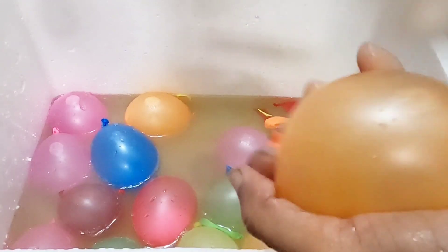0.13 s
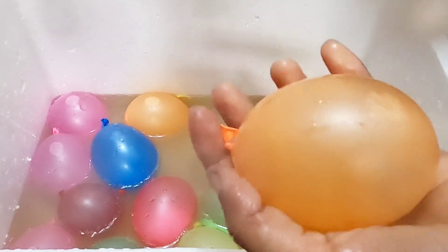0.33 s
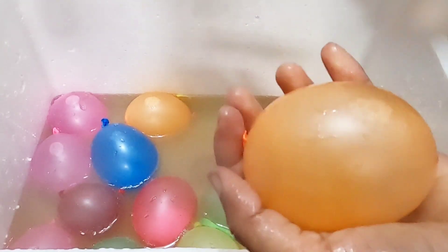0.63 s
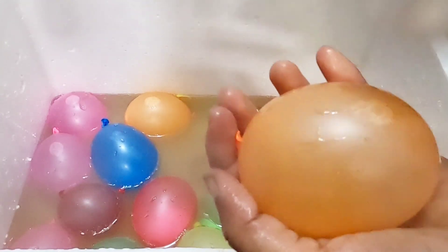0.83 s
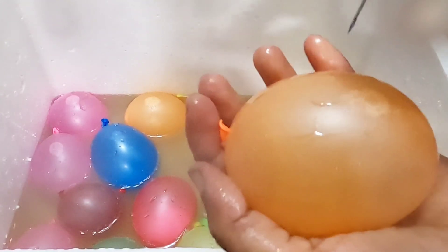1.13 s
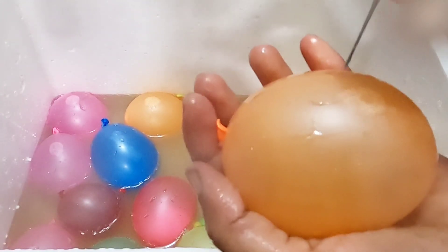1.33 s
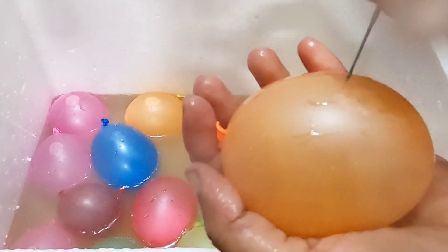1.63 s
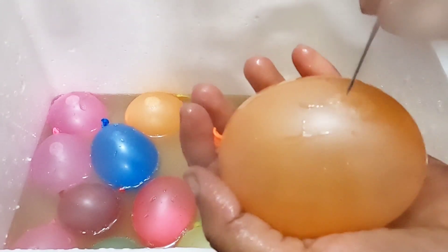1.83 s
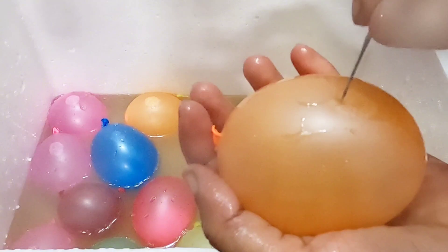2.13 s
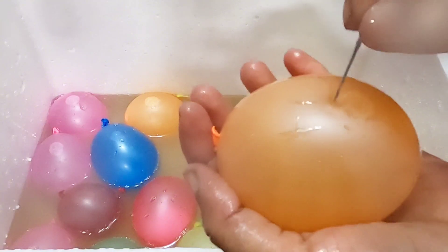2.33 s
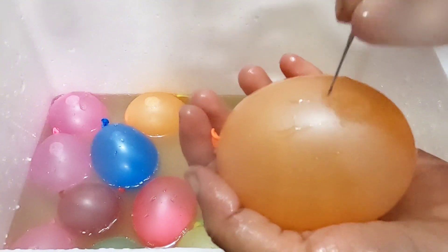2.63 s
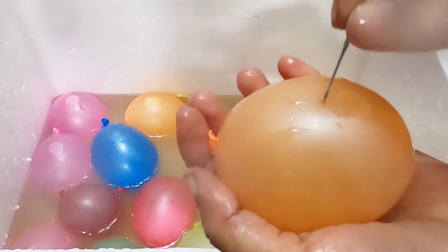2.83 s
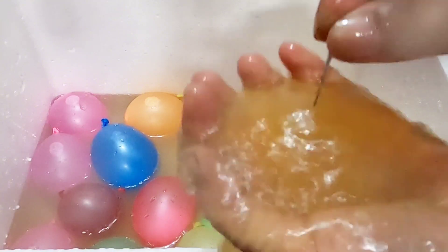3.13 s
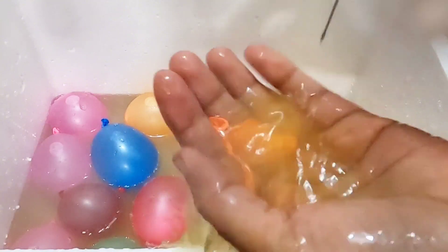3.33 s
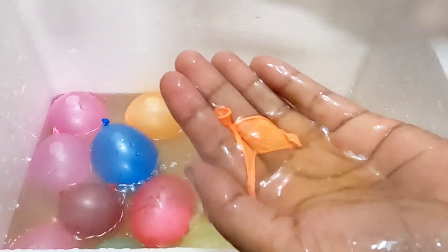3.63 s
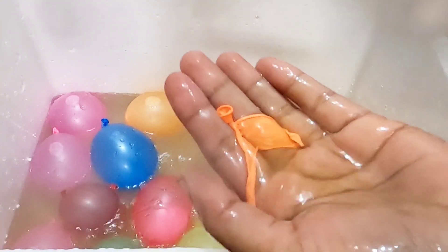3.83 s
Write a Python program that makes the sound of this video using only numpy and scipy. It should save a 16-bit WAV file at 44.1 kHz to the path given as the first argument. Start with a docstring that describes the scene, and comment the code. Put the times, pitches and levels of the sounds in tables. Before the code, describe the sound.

Close up in a small room, water trickles off a held balloon, faint rubber squeaks follow over a soft wavering hum, then a sharp pop, fine spray and a heavy gurgling splash into a tub.

```python
"""In a small room, a water balloon held in a wet hand over a foam tub is pricked. First it drips, in decaying
noise with droplet grains; wet skin ticks in noise bursts, rubber squeaks in gliding sines, and a low hum of
wavering sines lies over rumble and hiss. The rubber tears with a crack of shaped noise, spray flies, then the
water falls into the tub: grains and noise gurgle and fizz, rising sines are single bubbles, and resonant
filters are the drumming walls."""
import sys
import numpy as np
from scipy import signal
from scipy.fft import rfft, irfft, next_fast_len
from scipy.io import wavfile
from scipy.ndimage import map_coordinates

SR = 44100
rng = np.random.default_rng(int(sys.argv[2]) if len(sys.argv) > 2 else 0)


def transcribe(u):
    """Save the signal u as a 16-bit wav file named by the first command-line argument.

    u: samples, shape (n,) or (channels, n), limited to [-1, 1]; the rate is SR.
    q: integer samples, one column per channel.
    """
    v = np.clip(np.atleast_2d(u).T, -1, 1)
    q = np.round(v * 32767).astype(np.int16)
    wavfile.write(sys.argv[1], SR, q)


def level_to_linear(level):
    """Convert decibel levels to linear amplitude factors, elementwise."""
    exponent = np.asarray(level, float) / 20
    return 10 ** exponent


N = 176400
T = np.arange(N) / SR  # time in s

# Spectra named .._SPECTRUM give shape only, in columns: f/Hz, relative density/dB

# Wavering of the whole hum: t/s, level/dB
HUM_LEVEL = [(0, -37), (.64, -37), (.79, -48), (1, -41), (1.65, -38), (2.15, -43), (2.28, -34), (2.7, -42),
             (2.85, -35), (3.2, -38.5)]
# Partials of the hum: f/Hz, level relative to the hum/dB
HUM_PARTIALS = [(157.7, 0.5), (183, -4), (91.7, -12), (239.6, -19.5)]
# Low rumble of the room
RUMBLE_SPECTRUM = [(22, 8.5), (36, -17.5), (125, -7), (165, 1.5), (220, -13.5), (265, -19.5), (420, -34),
                   (600, -41), (700, -120)]
# Faint hiss
HISS_SPECTRUM = [(300, -19), (450, -6), (1200, -3), (1900, -10), (6500, -8), (9000, -12), (12300, -21.5),
                 (13500, -49)]
# Course of the hiss: t/s, level/dB
HISS_COURSE = [(.5, -69.5), (.72, -65), (.9, -71), (1.25, -70.5), (1.75, -73.5), (1.85, -66), (2.05, -72.5)]

# Water running off the lifted balloon: t/s, level/dB
RUNOFF_LEVEL = [(0, -48.5), (0.044, -55), (0.071, -42), (.19, -55), (.31, -47), (.42, -58), (0.549, -70)]
RUNOFF_SPECTRUM = [(180, -30), (330, -6.5), (700, -16), (1100, -12), (4350, -13.5), (11500, -27.5),
                   (15500, -45.5)]
# Clearest ticks of wet skin and rubber: t/s, initial level/dB
CLEAR_TICKS = [(0.463, -57), (1.812, -57.5), (2.711, -58)]
# Single slaps of water: t/s, initial level/dB, centre f/Hz
WATER_SLAPS = [(.055, -37.5, 1690), (.309, -37, 3240), (1.885, -60, 2130), (3.249, -23, 4400),
               (3.398, -32.5, 4900), (3.458, -18.5, 5000), (3.473, -21, 4500), (3.52, -21, 4000),
               (3.586, -25, 2200), (3.641, -27, 7000), (3.658, -24, 4500), (3.732, -36.5, 5520),
               (3.78, -26.5, 6000), (3.822, -33.5, 6370), (3.87, -40, 2600)]
# Faint squeaks of wet rubber: t/s, length/s, start f/Hz, end f/Hz, level/dB
SQUEAKS = [(.2, .14, 4300, 4350, -58), (.3, .12, 3150, 3200, -56), (.5, .62, 2350, 2500, -76),
           (1.05, .3, 2250, 2050, -77), (2.95, .27, 2500, 2750, -75)]

# Tearing rubber: t/s, rms level/dB
TEAR_LEVEL = [(3.1866, -70), (3.1871, -18), (3.1888, -22), (3.1899, -11), (3.1909, -22), (3.194, -24),
              (3.198, -40)]
TEAR_SPECTRUM = [(300, -23), (1730, -24), (3420, 1), (4380, -5), (5000, -1), (5800, -8), (7820, -3),
                 (10500, -6), (15700, -32)]
# Spray: t/s, level of the fine spray/dB, coarser drops relative to it/dB
SPRAY_LEVELS = [(3.193, -32.5, -26.5), (3.227, -31, -18.5), (3.25, -32, -3), (3.311, -36.5, -5),
                (3.41, -45, -2)]
SPRAY_SPECTRUM = [(1290, -14), (2200, -15), (3290, 1), (4460, -3), (7240, -0.5), (12100, -12.5),
                  (15700, -25)]

# Water falling into the tub: t/s, gurgle level/dB, fizz relative to it/dB
POUR_LEVELS = [(3.392, -39, -6), (3.416, -36, 9.5), (3.459, -25.5, 2), (3.511, -29, 7.5), (3.6, -23, -3.5),
               (3.678, -25.5, -2), (3.77, -31.5, -2), (3.826, -32.5, 4), (3.849, -27, -2.5), (4, -41.5, -6)]
# Gurgling water, and also the coarser drops of the spray
GURGLE_SPECTRUM = [(240, -17.5), (400, -14.5), (750, -20), (1000, -12), (1350, -15.5), (2500, -12.5),
                   (3600, -19), (5500, -62)]
FIZZ_SPECTRUM = [(1500, -15), (2800, -7), (4520, -4.5), (11100, -18), (14300, -31), (15700, -64)]
# Resonances of the tub walls: f/Hz, width/Hz, relative level/dB
WALL_MODES = [(67.6, 6.9, -3.5), (166.7, 4.1, -0.5), (254.3, 8, -9.5), (282.4, 8.3, -7.5), (360, 68, -14.5)]
# Heavy lumps of water hitting the tub: t/s, level of the blow ahead of the walls/dB
LUMP_BLOWS = [(3.452, 37.5), (3.489, 39), (3.533, 35), (3.69, 37), (3.839, 37.5)]
# Single bubbles: t/s, peak level/dB, starting f/Hz
SINGLE_BUBBLES = [(3.41, -24.5, 1400), (3.418, -18.5, 2105), (3.433, -12, 2990), (3.478, -17, 2600),
                  (3.593, -20, 1025), (3.647, -21, 1420), (3.793, -21, 4220), (3.839, -20, 997),
                  (3.895, -25.5, 967)]

# Likeness of the two channels: f/Hz, left-right correlation
COHERENCE = [(60, 1), (300, 0.91), (4000, 0.52), (15000, 0.65)]
# Balance of the two channels: f/Hz, left over right/dB
BALANCE = [(60, -2), (380, 0), (15000, 2)]


def unit(x):
    """Normalisation: the signal is scaled to rms 1."""
    return x / np.sqrt(np.mean(x ** 2) + 1e-20)


def along(points, hz):
    """Logarithmic frequency scale: (f/Hz, value) points are joined linearly in log f."""
    f, value = np.transpose(points)
    return np.interp(np.log(hz + 1), np.log(f + 1), value)


def curves(rows, outside=None):
    """Linear interpolation in time: one value per sample for each column after the time."""
    s, *columns = np.transpose(rows)
    return [np.interp(T, s, column, outside, outside) for column in columns]


def wobble(rate):
    """Slow random modulation: a smooth curve through random knots, rate of them a second."""
    return map_coordinates(rng.standard_normal(N // 100), [T * rate])


def filtered(x, response):
    """Linear filtering: the spectrum is multiplied by a response of frequency."""
    m = next_fast_len(N + SR // 2)
    return irfft(rfft(x, m) * response(np.fft.rfftfreq(m, 1 / SR)), m)[..., :N]


def spread(pair, spectrum):
    """Interchannel coherence: two unrelated signals are coloured and mixed to a stereo pair of rms 1."""
    def mid_side_response(hz):
        angle = np.arccos(np.clip(along(COHERENCE, hz), -1, 1)) / 2
        return level_to_linear(along(spectrum, hz)) * [np.cos(angle), np.sin(angle)]

    mid, side = filtered(pair, mid_side_response)
    left_right = np.array([mid + side, mid - side])
    return unit(filtered(left_right, lambda hz: level_to_linear(np.outer([.5, -.5], along(BALANCE, hz)))))


def stereo_noise(spectrum):
    """Random noise: two independent white signals are given a spectrum and a stereo width."""
    return spread(rng.standard_normal((2, N)), spectrum)


def grains(count, t0, t1, hz, cycles):
    """Damped oscillation: rising sines of random time, pitch and size have rms 1 over the span."""
    when, octaves = rng.random(count), rng.standard_normal(count)
    size_db = 3 * rng.exponential(size=count)
    f = np.clip(hz * 2 ** octaves, 250, 15000)[:, None]
    k = np.arange(700)  # samples into a grain
    u = k / SR * f / cycles  # age in lives
    envelope = level_to_linear(size_db)[:, None] * u * np.exp(-3 * u)
    wave = envelope * np.sin(2 * np.pi * f * k / SR * (1 + 0.15 * u))
    start = ((t0 + (t1 - t0) * when) * SR).astype(int)[:, None]
    out = np.bincount((start + k).ravel(), wave.ravel(), N + SR)[:N]
    return out / np.sqrt(np.sum(out ** 2) / (SR * (t1 - t0)))


def water(spectrum, rows, count, hz, cycles, share):
    """Superposition: noise and a power share of droplet and bubble grains fill the span of rows at rms 1."""
    t0, t1 = rows[0][0], rows[-1][0]

    def mixture():
        noise = np.sqrt(1 - share) * rng.standard_normal(N)
        return noise + np.sqrt(share) * grains(count, t0, t1, hz, cycles)

    def flattening(f):
        # Lowers the hump of the grains around their middle pitch
        hump = np.exp(-np.log2((f + 1) / hz) ** 2 / 2)
        return 1 / np.sqrt(1 + 2 * share * hump)

    pair = np.array([mixture(), mixture()])
    out = spread(filtered(pair, flattening), spectrum)
    return (T >= t0) * (T <= t1) * out / np.std(out[:, int(t0 * SR):int(t1 * SR)])


def bursts(rows, t60_s, octaves):
    """Exponential decay: each row (t/s, initial level/dB, centre f/Hz) is a short band of noise."""
    out, t = np.zeros(N + SR), np.arange(2048) / SR
    f = np.fft.rfftfreq(len(t), 1 / SR) + 1
    for s, db, hz in rows:
        band = np.exp(-(np.log2(f / hz) / octaves) ** 2 / 2)
        noise = unit(irfft(rfft(rng.standard_normal(len(t))) * band))
        onset = 1 - np.exp(-t / .0012)
        out[round(s * SR):][:len(t)] += level_to_linear(db - 60 * t / t60_s) * onset * noise
    return out[:N]


def room_tone():
    """Amplitude and phase modulation: hum tones waver in a small room's resonances, over rumble and hiss."""
    tones = np.zeros(N)
    for hz, db in HUM_PARTIALS:
        flutter_db, wander_rad = 3 * wobble(9), 1.6 * wobble(6)
        tones += level_to_linear(db + flutter_db) * np.sin(2 * np.pi * hz * T + wander_rad)
    hum = level_to_linear(curves(HUM_LEVEL)[0]) * tones
    rumble = level_to_linear(-41.5) * stereo_noise(RUMBLE_SPECTRUM)
    hiss_db = curves(HISS_COURSE)[0] + 0.85 * wobble(10.09)
    return hum + rumble + level_to_linear(hiss_db) * stereo_noise(HISS_SPECTRUM)


def runoff():
    """Superposed droplet impacts: water trickles from the lifted balloon."""
    trickle = water(RUNOFF_SPECTRUM, RUNOFF_LEVEL, count=2000, hz=2600, cycles=7.4, share=0.3)
    return level_to_linear(curves(RUNOFF_LEVEL)[0]) * trickle


def ticks(count=220):
    """Impulsive excitation: wet skin and rubber give a few clear ticks and many fainter ones at random."""
    centre_hz = 7800
    clear = [(s, db, centre_hz) for s, db in CLEAR_TICKS]
    faint = [(when * N / SR, -80 + 10 * size, centre_hz * (1 + pitch) / np.sqrt(3))
             for when, size, pitch in rng.random((count, 3))]
    return bursts(clear + faint, t60_s=.035, octaves=.45)


def slaps():
    """Impact noise: single slaps of water are decaying noise, each around its own centre frequency."""
    return bursts(WATER_SLAPS, t60_s=.05, octaves=.8)


def squeaks():
    """Frequency modulation: wet rubber squeaks faintly in blurred, wavering glides."""
    out = np.zeros(N)
    for s, length, hz0, hz1, db in SQUEAKS:
        u = np.clip((T - s) / length, 0, 1)
        envelope = level_to_linear(db) * np.sqrt(u * (1 - u)) * 2 * wobble(230)
        hz = (hz0 + (hz1 - hz0) * u) * (1 + 0.0077 * wobble(7.8))
        out += envelope * np.sin(2 * np.pi * np.cumsum(hz) / SR)
    return out


def tear():
    """Transient broadband radiation: the tearing rubber cracks as noise under a very short envelope."""
    return level_to_linear(curves(TEAR_LEVEL, -140)[0]) * stereo_noise(TEAR_SPECTRUM)


def push():
    """Damped low-frequency pulse: the slack of the skin gives one low push."""
    start_s, hz = 3.188, 55
    u = np.clip(T - start_s, 0, None) * hz  # age in cycles
    return level_to_linear(-30) * np.sin(2 * np.pi * u) * np.exp(-2 * u)


def spray():
    """Superposed droplet sounds: fine spray lies high in pitch, coarser drops lower."""
    fine_db, coarse_db = curves(SPRAY_LEVELS)
    fine = water(SPRAY_SPECTRUM, SPRAY_LEVELS, count=1500, hz=6000, cycles=3.4, share=0.13)
    coarse = water(GURGLE_SPECTRUM, SPRAY_LEVELS, count=400, hz=1400, cycles=4.2, share=0.21)
    return level_to_linear(fine_db) * (fine + level_to_linear(coarse_db) * coarse)


def wall_response(f):
    """Modal superposition: resonances of alternating sign, with the treble rolled off above 450 Hz."""
    total = 0
    for k, (centre, width, db) in enumerate(WALL_MODES):
        damping = 1j * f * width
        total = total + (-1) ** k * level_to_linear(db) * damping / (centre ** 2 - f ** 2 + damping)
    return total / (1 + 1j * f / 450)


def pour():
    """Bubble noise and forced vibration: gurgle, fizz and drumming walls follow the falling water."""
    level_db, fizz_db = curves(POUR_LEVELS)
    gurgle = water(GURGLE_SPECTRUM, POUR_LEVELS, count=2400, hz=1997, cycles=4.8, share=0.55)
    gurgle = gurgle * level_to_linear(2.1 * wobble(45))
    fizz = water(FIZZ_SPECTRUM, POUR_LEVELS, count=3000, hz=5785, cycles=8.06, share=0.45)
    fizz = fizz * level_to_linear(fizz_db + 1.67 * wobble(70))
    drumming = level_to_linear(-6) * unit(filtered(stereo_noise([(450, 0)]), wall_response))
    return (T > POUR_LEVELS[0][0]) * level_to_linear(level_db) * (gurgle + fizz + drumming)


def thumps():
    """Impulse response: heavy lumps of water strike the walls, which ring a little louder at the right."""
    blows = np.zeros(N)
    for s, db in LUMP_BLOWS:
        blows[round(s * SR)] = level_to_linear(db)
    return level_to_linear([[-1.5], [1.5]]) * filtered(blows, wall_response)


def bubbles():
    """Bubble resonance: each bubble rings briefly as a damped sine of rising pitch."""
    life_cycles, phase_gain = 7.3, 0.0223  # phase_gain: extra share of phase per life
    out = np.zeros(N)
    for s, db, hz in SINGLE_BUBBLES:
        t = np.clip(T - s, 0, None)
        u = t * hz / life_cycles  # age in lives
        envelope = level_to_linear(db) * 2 * np.e * u * np.exp(-2 * u)  # peaks at half a life
        out += envelope * np.sin(2 * np.pi * hz * t * (1 + phase_gain * np.minimum(u, 10)))
    return out


def scene():
    """Linear superposition: all sources are added."""
    before = room_tone() + runoff() + ticks() + slaps() + squeaks()
    bursting = tear() + push() + spray()
    return before + bursting + pour() + thumps() + bubbles()


def band_limit(x):
    """A steep low-pass at the top of the band."""
    return signal.sosfilt(signal.butter(12, 15820, fs=SR, output="sos"), x)


def record(dry):
    """Band limitation: nothing at or above 15.8 kHz passes into the finished mix."""
    mix = filtered(dry, lambda hz: hz < 15800)
    return band_limit(mix)


dry = scene()
out = record(dry)
transcribe(out)
```